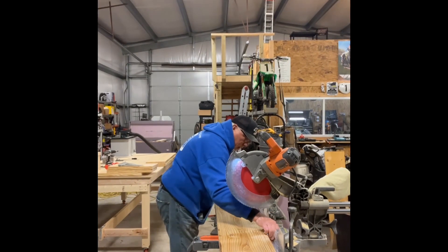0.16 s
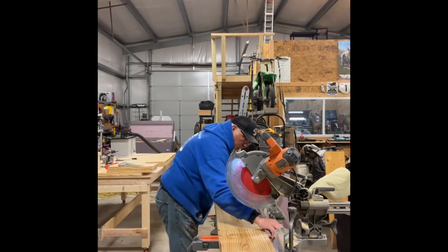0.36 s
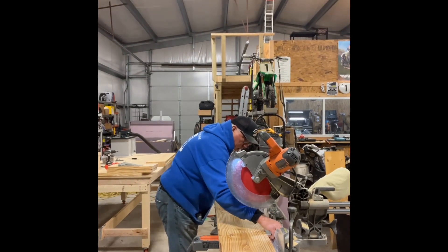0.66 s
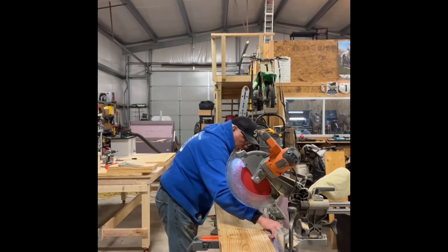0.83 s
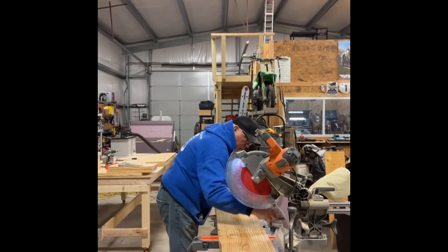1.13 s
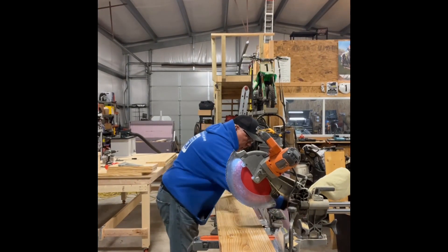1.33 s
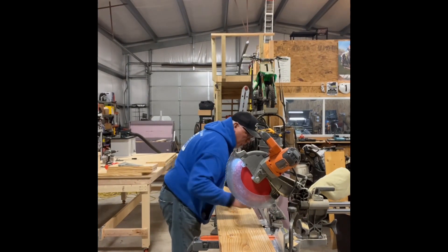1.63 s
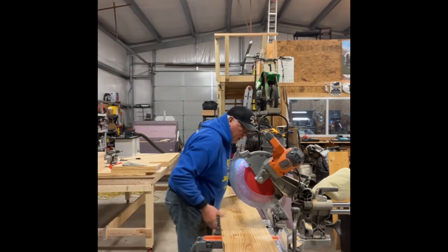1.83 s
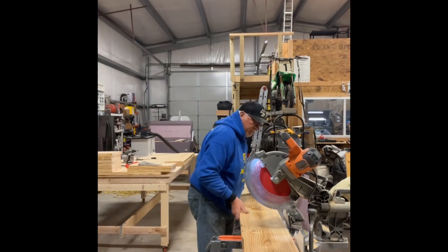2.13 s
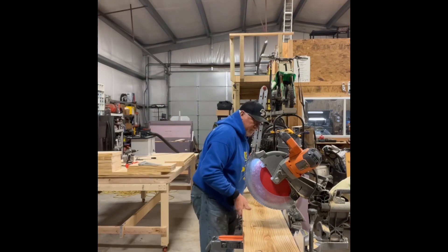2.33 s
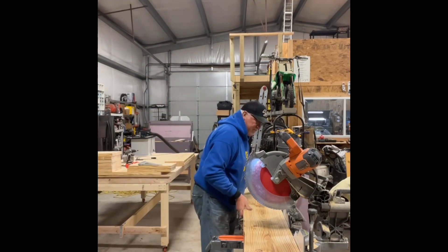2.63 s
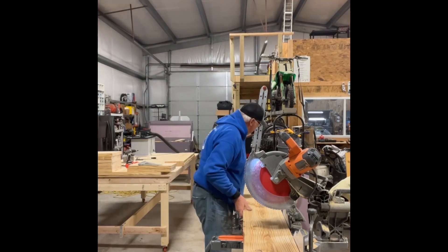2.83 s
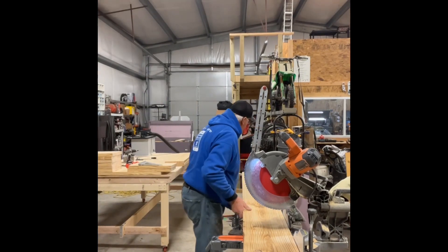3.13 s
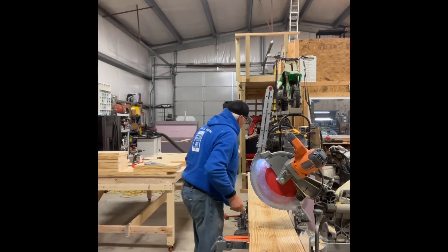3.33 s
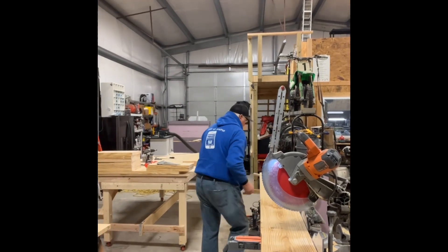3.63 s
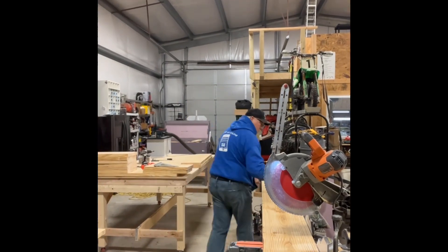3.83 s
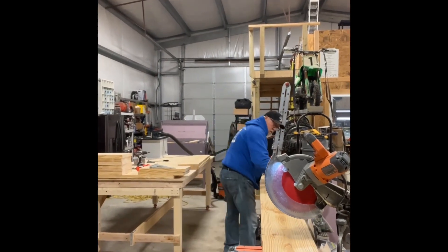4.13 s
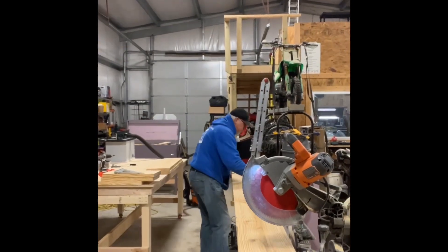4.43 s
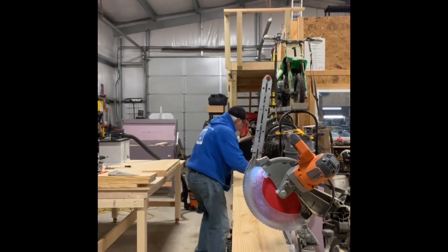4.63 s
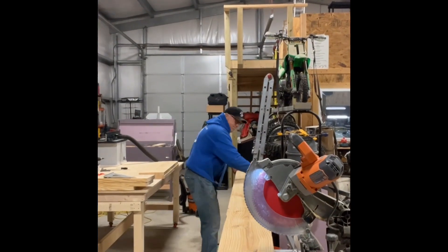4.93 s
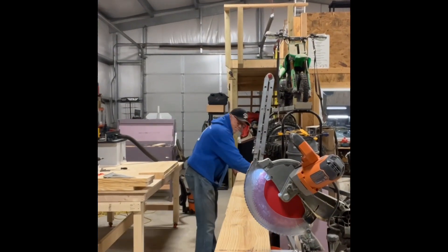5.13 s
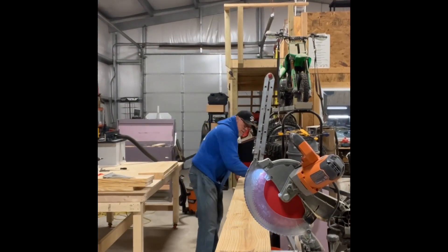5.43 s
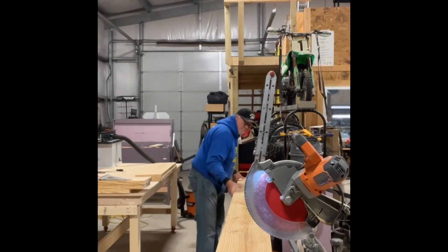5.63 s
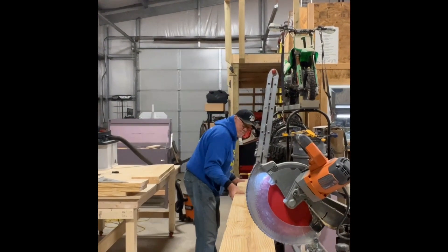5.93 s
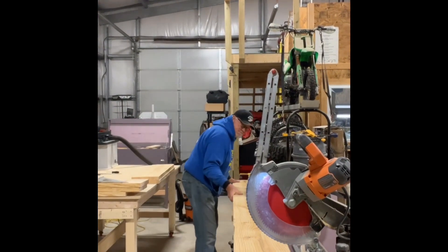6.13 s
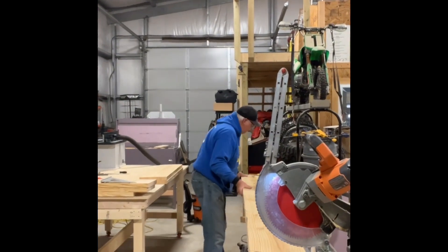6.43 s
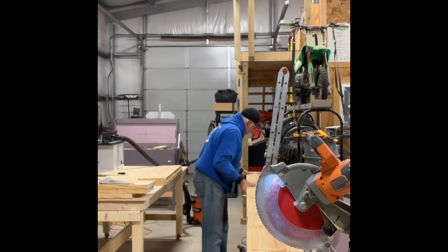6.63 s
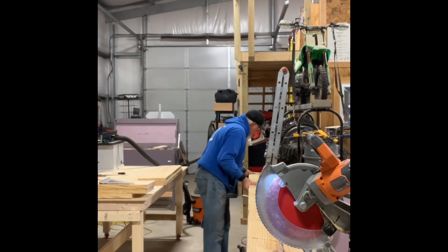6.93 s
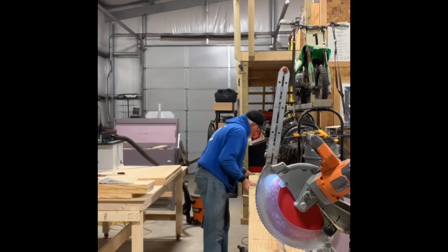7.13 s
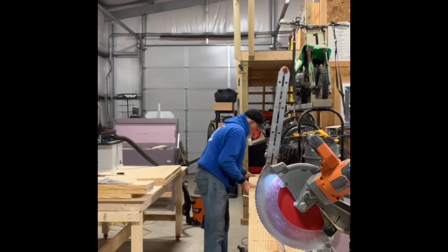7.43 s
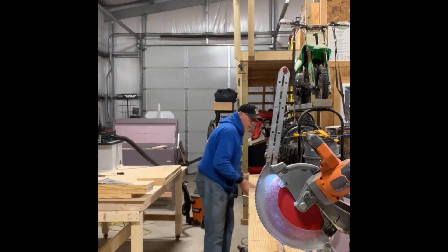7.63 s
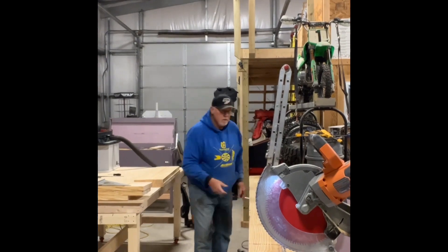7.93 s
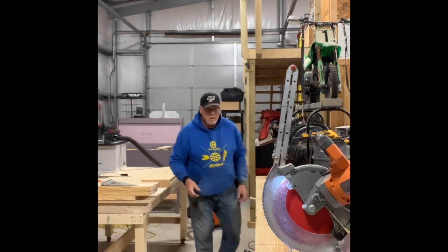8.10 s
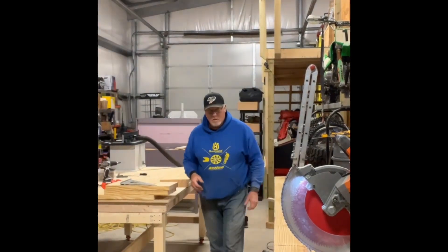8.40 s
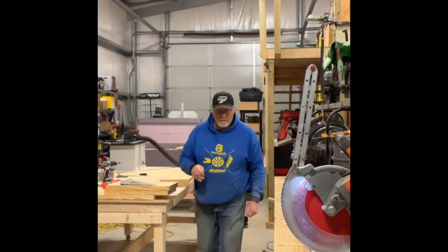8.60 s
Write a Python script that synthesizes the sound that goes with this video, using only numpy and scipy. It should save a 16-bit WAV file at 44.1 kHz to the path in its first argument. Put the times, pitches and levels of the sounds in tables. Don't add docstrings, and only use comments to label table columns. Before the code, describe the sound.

A large metal-clad workshop with faint air and a wavering low fan hum throughout. From 0 to 1 s only tiny taps, soft shifts and sleeve rustles. At about 1.5-1.6 s crisp dry wooden clacks and a set-down come in quick succession; a strong knock at 2.1 s sends an offcut skidding grittily until 2.5 s. From 2.6 to 3.9 s it is quiet, with cloth brushing and faint taps. At 4.1-4.2 s a board judders in a short harsh stick-slip groan, scrapes on, and slams loudly at 4.5 s, ringing briefly. A squeaky edge rub and clicks follow around 4.8-5.1 s, a hollow knock at 5.3 s. Soft pushes from 5.9 to 6.6 s carry a faint rising and falling whine. Firm landings hit at 6.7 and 7.1 s, with smaller knocks until 7.4 s. Afterwards only light rustles, one tiny tap near 8.5 s and the hum.

```python
import sys
import numpy as np
from scipy import signal
from scipy.fft import rfft, irfft
from scipy.io import wavfile
from scipy.ndimage import uniform_filter1d

SR = 44100
rng = np.random.default_rng(int(sys.argv[2]) if len(sys.argv) > 2 else 0)


def to_linear_factor(level_db):
    exponent = np.asarray(level_db, float) / 20
    return 10 ** exponent


def materialize(psi):
    bounded = np.clip(np.atleast_2d(psi).T, -1, 1)
    quanta = np.round(bounded * 32767).astype(np.int16)
    wavfile.write(sys.argv[1], SR, quanta)


N = 386316

# pitch_hz, level_db (per Hz)
HISS = [(1470, -30.5), (2500, -3), (3420, -4), (4990, -4), (5660, -6.5), (6470, -8.5), (7930, -11),
        (9330, -16), (10000, -16), (13000, -42), (22000, -120)]
# pitch_hz, level_db (per Hz)
FIZZ = [(3530, -40.5), (6000, -3.5), (8780, 0.5), (9640, 1.5), (15100, -1.5), (16200, -16.5),
        (16500, -37.5)]

# pitch_hz, level_db, t60_s
STOP_BLOCK = [(1051, 0, 0.027), (1556, -15, 0.053), (1981, -17, 0.05), (2460, -7.5, 0.047),
              (3246, -18, 0.3), (3950, -21.5, 0.2)]
OFFCUT_MODES = [(554, -26, 0.1), (1001, -33, 0.48), (1400, 0, 0.039), (1782, -9.5, 0.058),
                (2035, -28, 0.28), (2557, -8, 0.045), (3200, -14, .04)]
LONG_BOARD = [(657, -25, 0.24), (774, -20.5, 0.19), (974, -8.5, 0.14), (1168, -14, 0.15),
              (1572, -16.5, 0.43), (1766, 0, 0.086), (2288, -26.5, 5.0)]
SHORT_BOARD = [(790, 0, 0.074), (1357, -19, 0.16), (1580, -9, 0.1), (2024, -12, 0.069), (2417, -27, 0.24)]
WIDE_BOARD = [(361, -16.5, 0.14), (860, -18.5, 0.75), (964, -6, 0.13), (1155, 1, 0.099),
              (1360, -12.5, 0.25), (1990, -15, 0.38), (2650, -9, 0.13)]
BOARD_END = [(347, -16, 5.0), (474, -5.5, 0.25), (791, 0, 0.14), (1130, 0, 0.12), (1610, -2, 0.086),
             (1873, -8, 0.1)]
BOARD_FLAT = [(592, -20, 0.13), (800, -5, 0.07), (960, -12, 0.07), (1170, -2, 0.047), (1310, -5, 0.06),
              (1561, -4, 0.061), (2062, -19, 0.15)]


def evened(x):
    return x / np.sqrt(np.mean(x ** 2) + 1e-20)


def read(points, hz):
    f, value = np.transpose(points)
    return np.interp(np.log(hz + 1), np.log(f + 1), value)


def colour(x, points):
    gain = to_linear_factor(read(points, np.fft.rfftfreq(len(x), 1 / SR)))
    return irfft(rfft(x) * gain, len(x))


def add(mix, s, sound):
    part = mix[round(s * SR):][:len(sound)]
    part += sound[:len(part)]


def columns(rows):
    s, *rest = np.transpose(rows)
    t = np.arange(s[0], s[-1], 1 / SR)
    return s[0], [np.interp(t, s, c) for c in rest]


def resonate(x, hz, width):
    r = np.exp(-np.pi * width / SR)
    poles = [1, -2 * r * np.cos(2 * np.pi * hz / SR), r * r]
    return signal.lfilter([(1 - r * r) / 2, 0, (r * r - 1) / 2], poles, x)


def glide(x, hz, width):
    turn = np.exp(2j * np.pi * np.cumsum(hz) / SR)
    r = np.exp(-np.pi * width / SR)
    return evened((turn * signal.lfilter([1], [1, -2 * r, r * r], x / turn)).real)


def grit(size, per_s, spread_db):
    sizes = to_linear_factor(spread_db * np.minimum(rng.exponential(1, size), 4)) * rng.standard_normal(size)
    return evened(sizes * (rng.random(size) < per_s / SR))


def patchy(x, depth_db, size, bins, frames):
    z = signal.stft(x, nperseg=size)[2]
    field = uniform_filter1d(rng.standard_normal(z.shape[::-1]), frames, 0)
    field = evened(uniform_filter1d(field, bins, 1))
    return evened(signal.istft(z * to_linear_factor(depth_db * field.T), nperseg=size)[1][:len(x)])


def knock(blow_db, ring_hz, crack_db, t60, thud_db, count=36):
    # pitch_hz, level_db (per Hz)
    wood_spectrum = [(290, -46.5), (500, -18.5), (792, -3.5), (892, -19.5), (960, -3.5), (1040, -4),
                     (1750, -4), (2180, -2), (4500, -3.5), (5850, -43), (9900, -120)]
    t = np.arange(SR // 4) / SR
    u = rng.random((count, 3))
    hz = 500 * 9 ** ((np.arange(count) + u[:, 0]) / count)
    best = abs(np.log(hz / ring_hz)).argmin()
    hz[best] = ring_hz

    soft = np.clip(-crack_db / 25, 0, 1.7)
    near_db = 8 / (1 + (np.log(hz / ring_hz) / 0.15) ** 2)
    near_db -= 24 * soft * np.maximum(np.log2(hz / 1800), 0)
    near_db -= 15 * max(1 - 2.5 * soft, 0) * np.maximum(np.log2(ring_hz / hz) - .5, 0)
    level_db = read(wood_spectrum, hz) + 10 * np.log10(hz / 1500) + near_db
    life = np.maximum(t60, .01) * (0.44 + 0.14 * u[:, 1]) * (1500 / hz) ** 0.072
    life[best] *= 1 + 1.1 * max(1 - soft, 0)

    early = t[:SR // 7]
    fall = np.exp(np.float32(-np.log(1000) * early / life[:, None])) * to_linear_factor(level_db[:, None])
    waves = np.sin(np.float32(2 * np.pi * (hz[:, None] * early + u[:, 2:])))
    modes = np.zeros(len(t))
    modes[:len(early)] = (fall * waves).sum(0)
    modes *= 1 - np.exp(-t / (0.00018 + 0.00061 * soft))

    a, b = rng.standard_normal((2, len(t)))
    bright = evened(colour(a, HISS)) + to_linear_factor(.3 * crack_db - 8.5) * evened(colour(b, FIZZ))
    crack_fall = to_linear_factor(-60 * t / 0.028) + 0.56 * to_linear_factor(-60 * t / (1.2 * t60))
    crack = bright * crack_fall * (1 - np.exp(-t / 0.00065))

    thud = sum(np.sin(2 * np.pi * f * t) for f in rng.uniform(197, 560, 5)) * to_linear_factor(-60 * t / 0.12)
    boom = np.sin(2 * np.pi * 128 * t) * to_linear_factor(-60 * t / 0.14)
    thud += to_linear_factor(1.3 * blow_db + 3.5) * boom
    thud *= 1 - np.exp(-t / 0.008)
    body = 1.22 * modes / abs(modes).max()
    return to_linear_factor(blow_db) * (body + to_linear_factor(crack_db - 4.0) * crack + to_linear_factor(thud_db - 1.5) * thud)


def scuffed(sound, rise_ms):
    climb = np.minimum(np.arange(1, len(sound) + 1) / (rise_ms * SR / 1000 + 1), 1)
    swelled = sound * np.sin(np.pi / 2 * climb) ** 2
    return swelled * abs(sound).max() / abs(swelled).max()


def knocks():
    # start_s, blow_db, ring_hz, crack_db and thud_db (over the blow)
    set_downs = [(1.622, -16.5, 2475, -7, -27), (2.003, -40, 1520, -9.5, -13),
                 (4.031, -38, 1175, -12, -33.5), (4.525, -2.5, 1623, -12, -31.5),
                 (5, -26.5, 1160, -6.5, -25), (5.293, -20, 787, -22, -25), (5.496, -53, 1160, -13, -9),
                 (6.669, -10.5, 1038, -11, -26.5), (7.065, -13.5, 1320, -20.5, -18.5),
                 (7.115, -26.5, 721, -14, -37), (7.419, -47.5, 1500, -14, -24)]
    # start_s, blow_db, ring_hz, crack_db, thud_db
    clacks = [(0.987, -44.5, 1330, -1.5, -32), (1.513, -15.5, 2020, -2.5, -35),
              (1.568, -20, 2510, -1.5, -29), (1.579, -18.5, 2500, -2, -35), (2.11, -9.5, 1572, -16, -32),
              (2.115, -22.5, 1470, -32.5, -22), (3.474, -49, 614, -19.5, -8.5),
              (3.979, -48, 625, -33.5, -5), (4.441, -36, 1000, 5, -9), (5.046, -28.5, 1560, -2, -31),
              (5.111, -30, 2980, -1.5, -28), (5.149, -37.5, 3650, -4.5, -34),
              (6.671, -11.5, 2600, -8, -37.5), (7.076, -16, 1180, -23.5, -32),
              (7.166, -29.5, 1270, -27, -29), (7.262, -28.5, 784, -47, -42.5)]
    # start_s, blow_db, ring_hz, crack_db, rise_ms
    scuffs = [
        (1.961, -38, 750, -10.5, 4),
        (.51, -46, 2665, -4, 13),
        (.914, -46, 2800, -1, 5),
        (2.654, -41, 980, -13, 11),
        (4.338, -26, 1160, -6, 10),
        (4.502, -22.5, 1160, -9, 7.6),
        (4.769, -31, 1187, -11.5, 11),
        (5.931, -33, 980, -15, 6.5),
        (6.869, -22, 1220, -25, 5.6),
    ]
    # start_s, blow_db, ring_hz, crack_db
    taps = [(0.019, -48.5, 1520, -3.5), (0.162, -62.5, 2900, 7), (0.185, -48.5, 2350, -5),
            (0.281, -53, 2860, 0), (0.383, -58, 2630, 4.5), (0.404, -54, 2570, 1.5), (0.426, -57, 2550, -2),
            (0.608, -48, 1380, -8), (1.884, -58.5, 880, 0), (3.191, -46.5, 3100, -2.5),
            (3.279, -68, 3100, 14), (3.808, -52, 760, -5), (3.834, -47.5, 1115, -24),
            (8.484, -55, 1825, 4.5)]
    flat_t60, held_t60, tap_t60 = 0.14, .07, 0.1
    rows = [(*r[:4], flat_t60, r[4], 0) for r in set_downs]
    rows += [(*r[:4], held_t60, r[4], 0) for r in clacks]
    rows += [(*r[:4], flat_t60, -20.5, r[4]) for r in scuffs]
    rows += [(*r, tap_t60, -21, 0) for r in taps]
    return sorted(rows)


def strike(level_db, piece):
    t = np.arange(SR // 5) / SR
    hz, db, t60 = np.transpose(piece)[:, :, None]
    life = 0.74 * np.clip(t60, .02, .17)
    modes = to_linear_factor(level_db + db - 60 * t / life) * np.sin(2 * np.pi * hz * t)
    return modes.sum(0) * (1 - np.exp(-t / 0.00072))


def add_strikes(mix):
    # start_s, level_db, piece
    strikes = [
        (1.513, -26.5, STOP_BLOCK),
        (2.11, -12.5, OFFCUT_MODES),
        (4.525, -14.5, LONG_BOARD),
        (5.293, -27, SHORT_BOARD),
        (6.669, -21, WIDE_BOARD),
        (6.872, -29.5, BOARD_END),
        (7.066, -25, BOARD_FLAT),
    ]
    for s, *row in strikes:
        add(mix, s, strike(*row))


def ping(level_db, hz, t60):
    t = np.arange(SR // 3) / SR
    blur_hz = 90 * np.sqrt(hz / 2000)
    fuzz = glide(rng.standard_normal(len(t)), np.full(len(t), hz), blur_hz)
    tone = .9 * np.sin(2 * np.pi * hz * t) + .35 * fuzz
    return to_linear_factor(level_db - 60 * t / t60) * tone * (1 - np.exp(-t / .002))


def add_pings(mix):
    # start_s, level_db, pitch_hz, t60_s
    pings = [(1.621, -23, 2400, 0.08), (4.181, -17.5, 1785, 0.1), (4.2, -38, 5050, .2),
             (4.352, -30, 1780, .12), (5.3, -46, 4850, 0.2), (2.664, -43.5, 1760, .1),
             (.992, -52, 1320, 0.07), (4.445, -38, 980, .25), (4.385, -39.5, 1160, .25),
             (1.579, -30, 2480, .12), (1.626, -42, 400, .15), (1.963, -42, 750, .07),
             (2.113, -36, 420, .08), (7.07, -42, 330, .15), (4.772, -40, 1170, .1), (5.295, -26, 800, .09),
             (6.797, -44, 1150, .08), (.918, -46, 2800, .04), (5.001, -36, 650, .05),
             (4.866, -40, 960, .12), (4.343, -33, 1160, .15), (2.225, -43, 2020, .1), (2.28, -41, 1180, .1),
             (5.51, -52, 1160, .12), (.188, -53, 2200, .05), (.612, -56, 1300, .07)]
    for s, *row in pings:
        add(mix, s, ping(*row))


def add_ticks(mix):
    # start_s, blow_db, ring_hz, crack_db (over the blow)
    ticks = [(.908, -55, 2600, 0), (.945, -64, 3200, -4), (2.286, -37, 1200, -25), (4.378, -36, 2200, -16),
             (4.869, -33, 800, -15), (4.982, -30, 1170, -16), (7.14, -44, 2000, -14), (5.0, -27, 4200, -3),
             (5.037, -34, 3200, -1), (.921, -39.5, 2840, -3), (4.27, -39.5, 3500, 0),
             (4.442, -45, 4400, 12), (.163, -60, 2900, 6), (7.2, -48.5, 500, -25.5), (.75, -60, 850, -20),
             (4.902, -36, 1800, -6)]
    for s, *row in ticks:
        add(mix, s, knock(*row, .07, -39.5))


def rings(x):
    # pitch_hz, width_hz, level_db
    plank = [(980, 11, -5.5), (1160, 14, -2.5), (1790, 6.6, -3.5), (2250, 77, -10.5), (2440, 56, -11),
             (3690, 28, -10), (3850, 52, -19.5), (4640, 81, -12.5), (5050, 65, -11), (5490, 60, -12),
             (5640, 50, -13), (6240, 36, -23)]
    return sum((-1) ** k * to_linear_factor(db) * resonate(x, hz, w) for k, (hz, w, db) in enumerate(plank))


def judder():
    # start_s, force_db, slips_per_s, hiss_db (over the drag), contact_hz
    drag = [
        (4.086, -52, 215, 2.5, 1700),
        (4.098, -33.5, 222, 0, 1650),
        (4.106, -23.5, 226, -3.5, 1600),
        (4.118, -21, 224, -3.5, 1950),
        (4.13, -19.5, 214, -5.5, 2250),
        (4.144, -21.5, 206, -9, 2700),
        (4.157, -23, 203, -6, 2400),
        (4.172, -18, 205, 0.5, 2000),
        (4.188, -18.5, 226, -4.5, 1771),
        (4.206, -40, 228, 0, 1800),
    ]
    # pitch_hz, width_hz, level_db
    fence_modes = [(1500, 700, -1), (2900, 560, -7.5), (4100, 370, -12), (5240, 600, -11),
                   (14100, 500, -16)]
    rocking_db = [-19.5, -22, -19, -23, -14, -14, -19, -18, -15, -17]
    s, (force_db, per_s, hiss_db, contact_hz) = columns(drag)
    size = len(per_s)
    turns = np.cumsum(per_s) / SR
    slips = np.diff(np.floor(turns), prepend=0) * to_linear_factor(1.0 * rng.standard_normal(size))
    spray = (.3 + np.exp(-(turns % 1) / 0.34)) * rng.standard_normal(size)
    drive = evened(slips) + .42 * evened(spray)

    contact = glide(drive, contact_hz, 550)
    bend = (contact_hz / 2000) ** 0.16
    fence = sum(to_linear_factor(db) * glide(drive, hz * bend, w) for hz, w, db in fence_modes)
    fence = patchy(fence, 1.2, size=256, bins=3, frames=5)
    body = evened(.75 * contact + .6 * fence + .8 * evened(rings(drive)))
    body = signal.sosfilt(signal.butter(4, 880, "high", fs=SR, output="sos"), body)
    dust = evened(colour(spray, HISS)) + 1.2 * evened(colour(spray, FIZZ))
    flex = sum(to_linear_factor(db) * np.sin(2 * np.pi * (k + 1) * turns + k * k) for k, db in enumerate(rocking_db))
    sound = body + to_linear_factor(hiss_db - 7.0) * dust + flex
    return s, to_linear_factor(force_db) * sound * signal.windows.tukey(size, .1)


def saw_marks(rows, overtones_db, clean):
    s, (hz, level_db) = columns(rows)
    wobble, flutter = (evened(uniform_filter1d(v, 200)) for v in rng.standard_normal((2, len(hz))))
    turns = np.cumsum(hz * (1 + .014 * wobble)) / SR
    grain = rng.standard_normal(len(hz))
    tone = np.zeros(len(hz))
    for k, db in enumerate(overtones_db, 1):
        pure = np.sqrt(2) * np.sin(2 * np.pi * k * turns)
        blurred = glide(grain, k * hz, k * 70)
        tone += to_linear_factor(db) * (clean / k * pure + (1 - clean / k) * blurred)
    return s, to_linear_factor(level_db + 2.2 * flutter) * tone * signal.windows.tukey(len(hz), .1)


def whine():
    # start_s, marks_per_s, level_db
    push = [(6.225, 1450, -61), (6.275, 2250, -57), (6.33, 2250, -51), (6.36, 2310, -58), (6.42, 2440, -55),
            (6.465, 2320, -47), (6.488, 2260, -51), (6.497, 2070, -45.5), (6.527, 1840, -50),
            (6.548, 1500, -47), (6.59, 1040, -58)]
    overtones_db = [7, -4, -9, -12]
    return saw_marks(push, overtones_db, .6)


def creep():
    # start_s, marks_per_s, level_db
    push = [
        (6.0, 1350, -68),
        (6.04, 1540, -55),
        (6.07, 1500, -55.5),
        (6.12, 1470, -60),
        (6.17, 1530, -65),
        (6.2, 1500, -70),
    ]
    overtones_db = [0, -14, -3, -4, -21, -8, -13]
    return saw_marks(push, overtones_db, 0.18)


def rub():
    # start_s, level_db, pitch_hz
    edge_song = [
        (4.82, -52, 1130),
        (4.875, -39, 1160),
        (4.914, -35, 1160),
        (4.937, -46, 1170),
        (4.962, -35, 1160),
        (4.983, -28.5, 1190),
        (4.997, -39, 1160),
        (5.052, -47, 1160),
        (5.08, -55, 1160),
    ]
    # ratio, level_db
    partners = [(.69, -8.5), (.835, -11), (1.3, -12)]
    s, (level_db, hz) = columns(edge_song)
    grain = rng.standard_normal(len(hz))
    steady = np.sqrt(2) * np.sin(2 * np.pi * np.cumsum(hz) / SR)
    tone = .6 * steady + .4 * glide(grain, hz, 110)
    tone += sum(to_linear_factor(db) * glide(grain, ratio * hz, 90) for ratio, db in partners)
    return s, to_linear_factor(level_db) * tone * signal.windows.tukey(len(hz), .1)


def coast(rows, body, broad):
    s, (level_db,) = columns(rows)
    drive = grit(len(level_db), 1500, 4)
    tones = sum(to_linear_factor(db) * evened(resonate(drive, hz, w)) for hz, w, db in body)
    wide = glide(drive, np.full(len(drive), body[1][0] * 1.15), 700)
    sound = evened(evened(tones) + broad * wide)
    return s, to_linear_factor(level_db) * sound * signal.windows.tukey(len(drive), .05)


def skid():
    # start_s, level_db
    path = [
        (2.115, -36),
        (2.16, -40),
        (2.24, -43),
        (2.29, -45),
        (2.32, -48),
        (2.35, -45),
        (2.44, -52),
        (2.48, -68),
        (2.52, -75),
    ]
    # pitch_hz, width_hz, level_db
    offcut = [(668, 28, -6), (1167, 44, -0.5), (1390, 56, -1), (1600, 48, -2), (1780, 41, -3.5),
              (2002, 29, -3.5), (2570, 34, -13), (2830, 66, -17), (3870, 74, -13)]
    return coast(path, offcut, 0.53)


def rumble():
    # start_s, level_db
    path = [
        (2.12, -63),
        (2.3, -62.5),
        (2.46, -57.5),
        (2.55, -70),
        (2.62, -76.5),
    ]
    # pitch_hz, width_hz, level_db
    bench = [(260, 120, -1), (403, 150, -1.5), (560, 150, -5)]
    return coast(path, bench, .1)


def swell(s, level_db, rise_ms, fall_ms, roundness):
    late_ms = 1000 * (np.arange(0, N, 64) / SR - s)
    span = np.where(late_ms < 0, rise_ms, fall_ms)
    return to_linear_factor(2 * np.maximum(level_db - 20 * (abs(late_ms) / span) ** roundness, -130))


def controls():
    # start_s, scrape_db, fall_ms (20 dB), fizz_db (over the scrape), centre_hz
    settles = [(0.0, -58, 80, -15, 1754), (1.63, -35, 85, -9.5, 1810), (2.008, -50, 202.5, -18, 1360),
               (2.12, -37.5, 150, -14, 1900), (4.2, -35.5, 220.5, -4.5, 1849),
               (4.535, -22, 110, -5.5, 1606), (5.301, -35.5, 64.5, -24, 1580),
               (5.503, -54, 299.5, -22, 1138), (5.942, -51, 499.5, -27.5, 1178),
               (6.68, -28.5, 131.5, -15.5, 1494), (6.88, -38.5, 80, -14, 1001),
               (7.074, -31, 120.5, -26, 1214), (7.27, -54, 59, -34, 958)]
    # peak_s, scrape_db, rise_ms and fall_ms (20 dB), centre_hz
    slides = [
        (2.096, -46, 50.5, 49, 1332),
        (4.37, -38, 59.5, 97.5, 1542),
        (4.44, -39.5, 30, 101, 1461),
        (4.91, -42.5, 137.5, 149.5, 1500),
        (5.0, -40.5, 121.5, 120, 1188),
        (6.056, -50, 120, 300, 1499),
        (6.3, -46.5, 154, 298.5, 1537),
        (6.6, -50.5, 299, 149, 1500),
    ]
    # peak_s, scrape_db, rise_ms, fall_ms, centre_hz
    shifts = [(.184, -63, 60, 71, 2210), (.5, -68, 401.5, 500, 1281), (1.47, -70, 200.5, 100.5, 1109),
              (2.68, -68.5, 59.5, 201, 1217), (3.21, -60, 40, 98.5, 1517), (3.479, -64, 31, 80.5, 615),
              (3.816, -67.5, 59.5, 200.5, 1080), (4.02, -60, 138.5, 101, 727), (6.295, -51, 24.5, 51, 490),
              (7.423, -63.5, 30, 72, 1313), (8.22, -65, 249.5, 299.5, 2398)]
    # peak_s, fizz_db, rise_ms, fall_ms, hiss_db (over the fizz)
    rustles = [(.02, -59.5, 9, 34, -13), (0.182, -57, 30, 46, -20), (.31, -69, 15, 70, -13),
               (.53, -67, 52, 144, 0), (.925, -56, 21, 60, -11), (1.0, -68, 40, 110, -19),
               (1.893, -59, 14, 74, -4.5), (1.971, -56, 18, 103, -3), (2.576, -58, 252, 249, -13),
               (2.699, -64.5, 152, 150, 1), (2.983, -48.5, 29, 67, -6), (3.066, -50, 41, 76, -4.5),
               (3.209, -59, 45, 200, -5.5), (3.45, -60.5, 31, 133.5, -9), (3.54, -60.5, 71.5, 93, -4),
               (3.634, -65.5, 19.5, 129, -5.5), (3.83, -63.5, 93, 303, -2.5),
               (7.383, -65.5, 21.5, 198.5, -17), (7.72, -63, 293, 250.5, 0), (8.085, -62, 20.5, 197.5, -6),
               (8.316, -74.5, 300, 119, 9.5), (8.484, -60.5, 9, 128, -16), (8.75, -72.5, 300.5, 101, 0.5)]
    # peak_s, fizz_db, rise_ms, fall_ms, hiss_db (over the fizz)
    sweeps = [
        (4.23, -47, 43, 119.5, 7.5),
        (4.432, -38, 200, 119.5, -6),
        (4.495, -41, 111, 99, -4.5),
        (5.008, -35.5, 174.5, 134, -8.5),
        (5.285, -57.5, 120, 51, -8),
        (6.056, -53, 126.5, 401, 4.5),
        (6.524, -56.5, 351, 399.5, 5),
        (7.124, -45, 14, 135, -0.5),
        (5.325, -58, 25, 150, -4),
        (5.56, -64, 60, 300, 0),
    ]
    wood = [(swell(s, db, 8, fall, 0.89), fizz_db, hz) for s, db, fall, fizz_db, hz in settles]
    wood += [(swell(*row, 1.4), -17.5, hz) for *row, hz in slides + shifts]
    cloth = [(swell(*row, 1.2), hiss_db) for *row, hiss_db in rustles + sweeps]

    scrape = sum(p for p, _, _ in wood)
    centre_hz = sum(p * hz for p, _, hz in wood) / scrape
    hiss = sum(p * to_linear_factor(2 * 0.55 * db) for p, db, _ in wood)
    hiss = hiss + sum(p * to_linear_factor(2 * db) for p, db in cloth)
    fizz = sum(p * to_linear_factor(2 * db) for p, db, _ in wood) + sum(p for p, _ in cloth)
    slow = np.sqrt(scrape), np.sqrt(hiss), np.sqrt(fizz), centre_hz
    return [np.interp(np.arange(N), np.arange(0, N, 64), c) for c in slow]


def strokes():
    # pitch_hz, level_db (per Hz)
    scrape_spectrum = [(150, -48.5), (300, -8.5), (800, -2), (3000, -6), (4500, -30)]
    scrape_gain, hiss_gain, fizz_gain, centre_hz = controls()
    size = len(centre_hz)
    catches = evened(colour(grit(size, 5000, 2.5), scrape_spectrum))
    scrape = evened(glide(catches, centre_hz, 1200) + 0.74 * catches + 0.71 * evened(rings(catches)))
    scrape = patchy(scrape, 3, size=1024, bins=1, frames=14)
    hiss = patchy(colour(grit(size, 8300, 1.5), HISS), 3, size=512, bins=4, frames=8)
    fizz = patchy(colour(grit(size, 9000, 1.5), FIZZ), 2.5, size=512, bins=8, frames=6)
    flicker = to_linear_factor(1.0 * evened(uniform_filter1d(rng.standard_normal(size), 500)))
    return 0, flicker * (scrape_gain * scrape + hiss_gain * hiss + fizz_gain * fizz)


def hall(x):
    # pitch_hz, t60_s
    decay = [(200, 0.74), (1000, 0.11), (3000, 0.33), (8000, 0.43), (16000, 0.047)]
    taps = np.zeros(SR)
    at = np.arange(200, SR - 20, 20)
    taps[at + rng.integers(0, 20, len(at))] = rng.choice([-1., 1.], len(at))
    hz, t, z = signal.stft(taps, SR, nperseg=256)
    tail = signal.istft(z * to_linear_factor(-60 * t / read(decay, hz)[:, None]), SR, nperseg=256)[1]
    return signal.fftconvolve(x, tail / np.linalg.norm(tail))[:N]


def workshop():
    # pitch_hz, level_db (per Hz)
    air_spectrum = [(18, -59.5), (30, -33), (176, -7.5), (223, -9.5), (291, -14), (694, -18), (835, -15),
                    (1090, -18.5), (1940, -16), (3380, -30.5), (12000, -33.5), (15200, -37.5), (16500, -50)]
    # pitch_hz, width_hz, level_db
    fan = [(173.4, 6.7, -81.5), (121, 47, -74), (181, 37, -85)]
    # start_s, level_db
    hum_curve = [(0.0, -72), (0.41, -65), (0.78, -73), (1.61, -60), (2.44, -62), (2.95, -92), (3.9, -68.5),
                 (4.61, -59.5), (5.5, -70), (6.8, -61.5), (8.76, -71.5)]
    # start_s, level_db
    draught = [
        (0, -76),
        (1.0, -79),
        (1.4, -83),
        (2.6, -84),
        (7.6, -84),
        (8.0, -78),
        (8.45, -77),
        (8.76, -82),
    ]
    t = np.arange(N) / SR
    waver = evened(uniform_filter1d(rng.standard_normal(N), 6000))
    tone = np.sqrt(2) * np.sin(2 * np.pi * np.cumsum(176.4 + 1.5 * waver) / SR)
    tone *= to_linear_factor(np.interp(t, *np.transpose(hum_curve)))
    hum = np.zeros(N)
    for hz, w, db in fan:
        hum += to_linear_factor(db) * evened(resonate(resonate(rng.standard_normal(N), hz, w), hz, w))
    noise = rng.standard_normal(N)
    whistle = evened(resonate(resonate(noise, 2500, 350), 2500, 350))
    whistle *= to_linear_factor(np.interp(t, *np.transpose(draught)) + 2 * waver)
    air = to_linear_factor(-67.5) * patchy(colour(noise, air_spectrum), 2, size=1024, bins=14, frames=16)
    return air + hum + tone + whistle


def scene():
    wood = np.zeros(N)
    for s, *row, rise_ms in knocks():
        add(wood, s, scuffed(knock(*row), rise_ms))
    add_strikes(wood)
    add_pings(wood)
    add_ticks(wood)
    for source in (judder, whine, creep, rub, skid, rumble, strokes):
        add(wood, *source())
    return (wood + to_linear_factor(-10.5) * hall(wood) + workshop())[None]


def top_cut(x):
    return signal.sosfilt(signal.butter(12, 16500, fs=SR, output="sos"), x)


def record(dry):
    x = signal.sosfilt(signal.butter(3, 90, "high", fs=SR, output="sos"), dry)
    ceiling = .93
    over = np.maximum(abs(x) - ceiling / 2, 0)
    x = np.sign(x) * (abs(x) - over + ceiling / 2 * np.tanh(2 * over / ceiling))
    return top_cut(x)


dry = scene()
out = record(dry)
materialize(out)
```